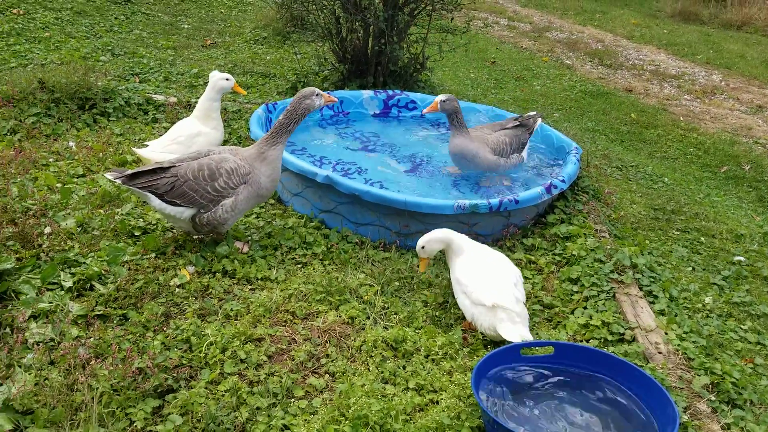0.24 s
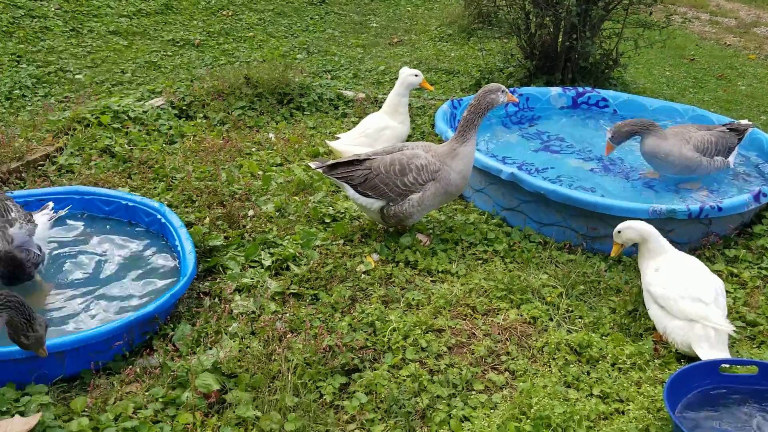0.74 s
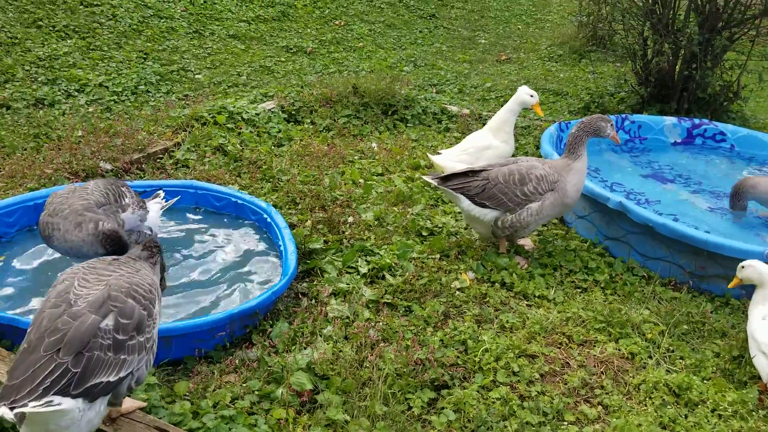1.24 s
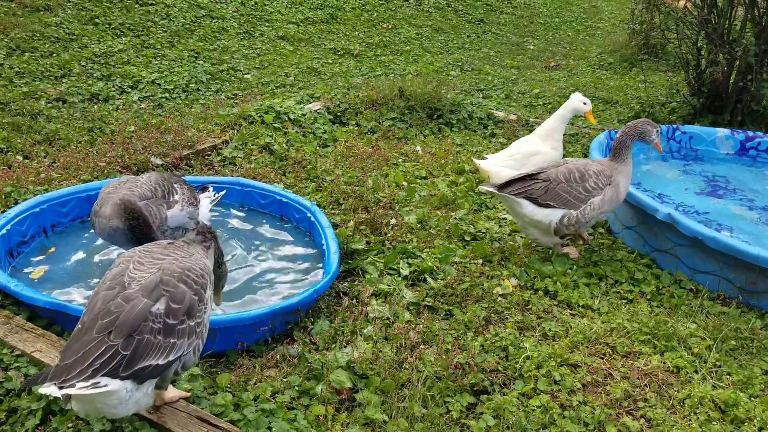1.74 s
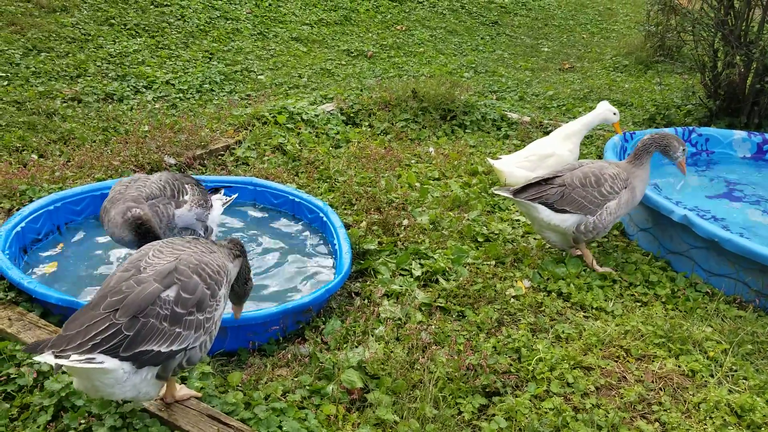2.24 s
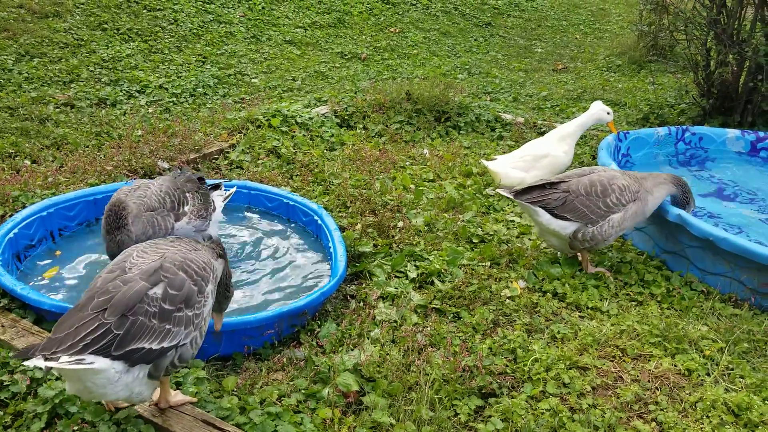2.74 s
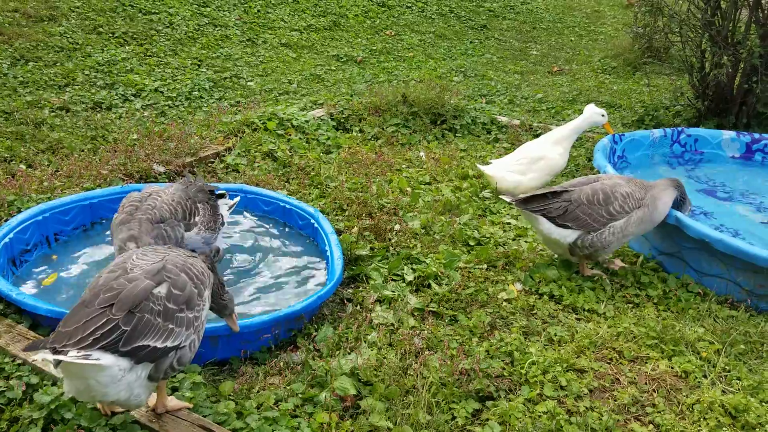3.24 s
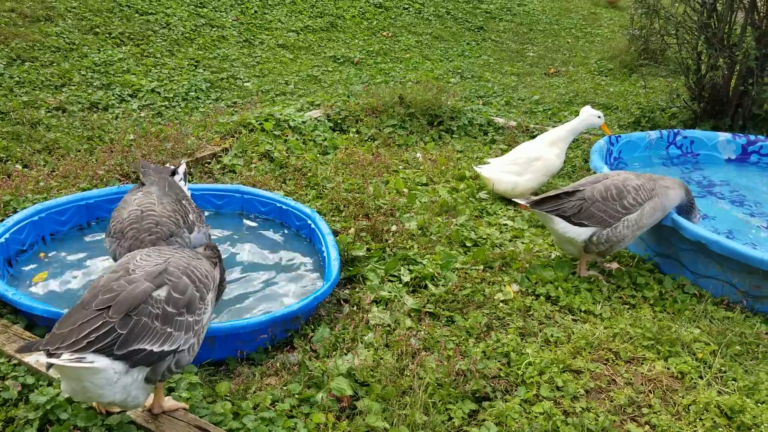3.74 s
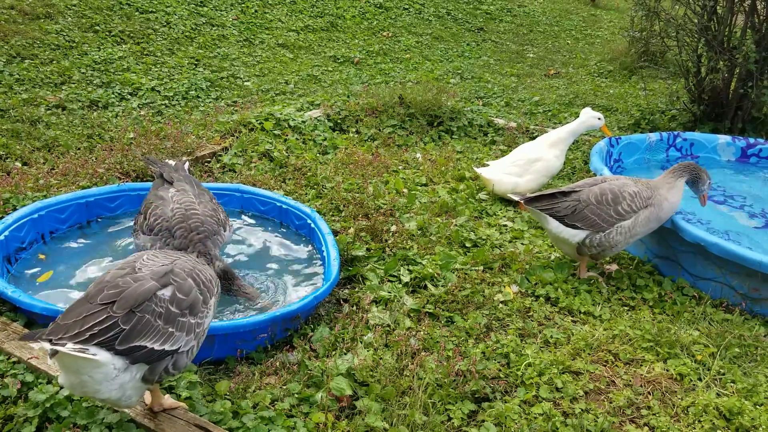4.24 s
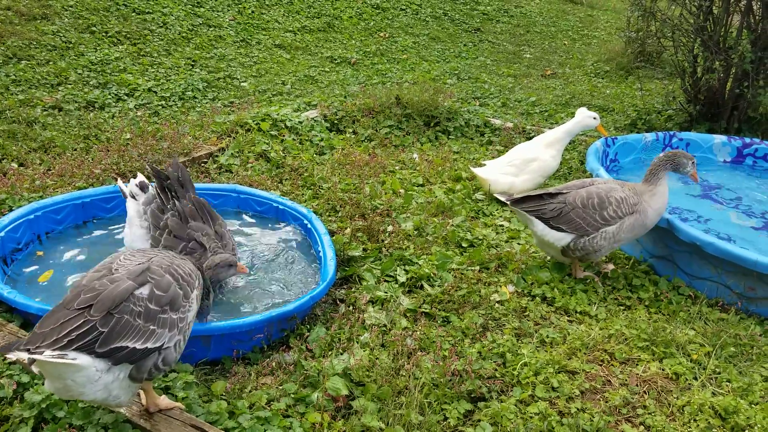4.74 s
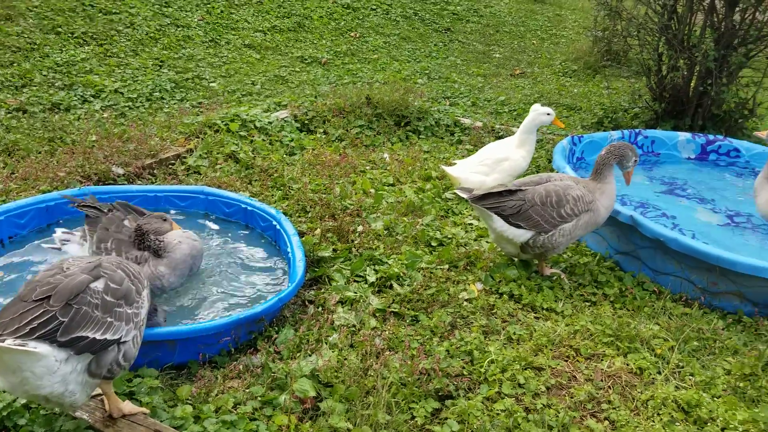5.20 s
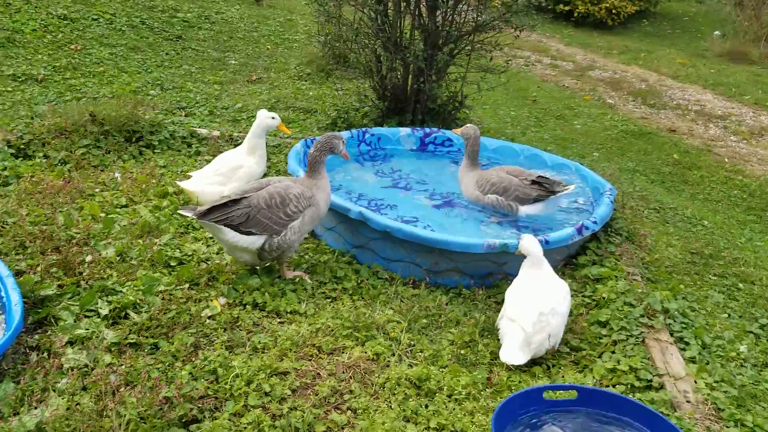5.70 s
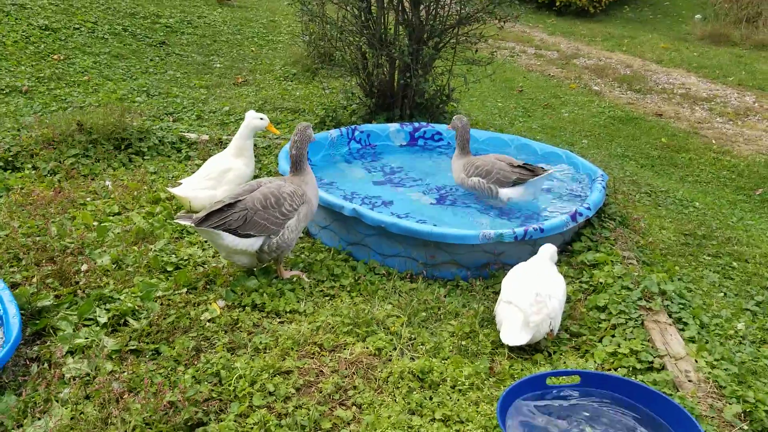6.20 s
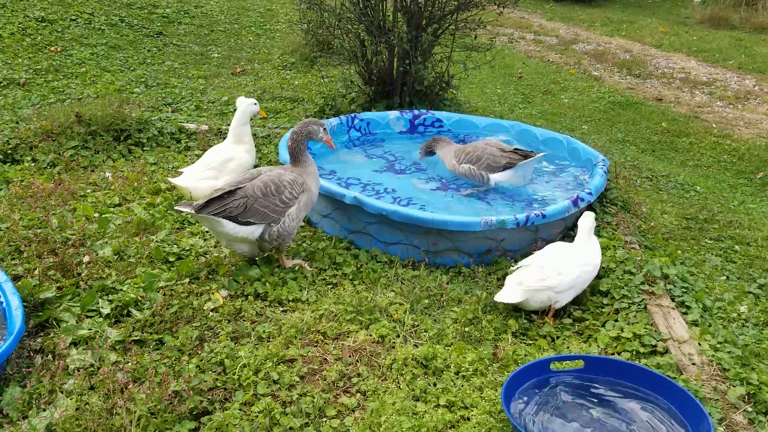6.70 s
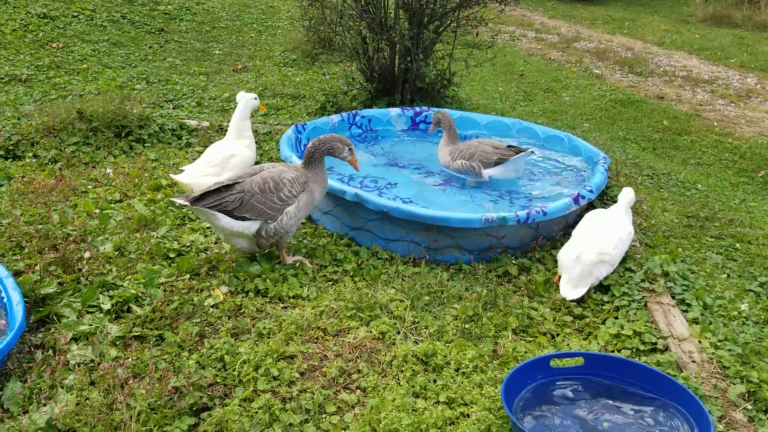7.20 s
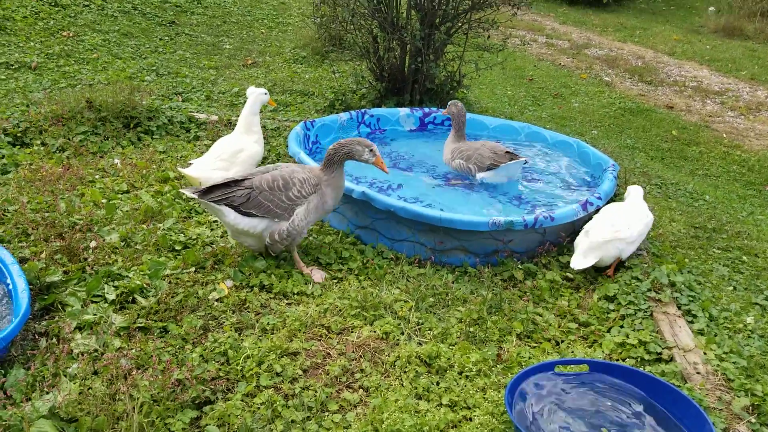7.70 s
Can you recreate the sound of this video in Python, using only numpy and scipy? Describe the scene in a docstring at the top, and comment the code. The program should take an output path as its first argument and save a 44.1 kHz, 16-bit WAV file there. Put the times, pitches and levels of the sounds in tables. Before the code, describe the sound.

Geese cluck low and throaty and murmur softly while bills plop in paddling-pool water, then a bathing goose sloshes and drips over faint insects.

```python
"""Geese around paddling pools

Geese cluck with pulsed throats and murmur in thin tones that break into pulses; a bill snaps and plops
under water. A bathing goose sloshes up swarms of bubbles, spray and drops, with drips and small cracks.
A bird chirps once and a knock bumps the microphone; filtered noise makes crickets and insects over a low hum."""
import sys
import numpy as np
from scipy import signal
from scipy.fft import rfft, irfft, next_fast_len
from scipy.io import wavfile
from scipy.ndimage import map_coordinates

SR = 44100
rng = np.random.default_rng(int(sys.argv[2]) if len(sys.argv) > 2 else 0)


def store_pcm(level_fs):
    """Save levels as 16-bit WAV."""
    pcm = np.round(np.clip(level_fs, -1, 1) * 32767).astype(np.int16)
    wavfile.write(sys.argv[1], SR, np.atleast_2d(pcm).T)


N = 350595
TIME = np.arange(N) / SR

# bill plops under water: start_s, level_db, cavity_hz, click_db
PLOPS = [(.0945, -33.5, 435, -42), (1.8713, -30, 368, -26.5), (1.885, -22, 269, -33),
         (1.9225, -40, 228, -33), (2.0341, -33.5, 267, -45), (2.053, -29.5, 390, -24),
         (2.067, -29.5, 395, -47), (2.164, -32, 292, -40), (2.2666, -25.5, 331, -24),
         (2.3915, -35, 336, -42), (2.408, -25, 342, -22), (2.541, -24, 280, -29.5),
         (3.088, -35.5, 179, -55), (3.649, -34, 156, -55)]
# the bill stirring the pool: peak_s, length_s, gurgle_db, squirt_db
STIRS = [(1.938, 0.017, -50, -41), (2.206, 0.012, -48, -44), (2.34, 0.018, -45, -44),
         (2.466, .02, -50, -46.5), (3.068, .032, -56, -53), (3.441, .024, -46.5, -47),
         (3.595, 0.11, -45, -49.5), (3.666, 0.0077, -59, -42.5), (3.741, 0.012, -34.5, -40),
         (3.85, 0.11, -45, -58.5), (3.946, 0.03, -54, -45.5), (4.365, 0.0061, -58, -42)]


def amp(db):
    """Decibels to gain."""
    return 10 ** (np.asarray(db) / 20)


def unit(x):
    """Scales to rms 1, taken at the centre of a stereo pair."""
    return x / np.sqrt(np.mean(np.atleast_2d(x).mean(0) ** 2) + 1e-20)


def read(points, hz):
    """Reads a spectrum on a log-frequency axis."""
    f, value = np.transpose(points)
    return np.interp(np.log(hz + 1), np.log(f + 1), value)


def level(rows, axis=1):
    """Gain over time from one dB column; silent outside its span."""
    rows = np.array(rows)
    return np.interp(TIME, rows[:, 0], amp(rows[:, axis]), left=0, right=0)


def swells(rows):
    """Bell-shaped gains from rows of (peak_s, length_s, level_db)."""
    t = TIME[::16]
    bells = sum(amp(db) * np.exp(-2 * np.minimum(((t - s) / length) ** 2, 20)) for s, length, db in rows)
    return np.interp(TIME, t, bells)


def wakes(rows, decay_s):
    """Gains that jump up and die away, from rows of (start_s, level_db); their powers add."""
    t = TIME[::16]
    power = sum((t > s) * amp(db) ** 2 * np.exp(-2 * abs(t - s) / decay_s) for s, db in rows)
    return np.interp(TIME, t, np.sqrt(power))


def spells(rows, rise_s=0.34, fall_s=0.33):
    """Gains that rise, hold and fall, from rows of (start_s, end_s, level_db)."""
    return sum(amp(db) * np.interp(TIME, [start - rise_s, start, end, end + fall_s], [0, 1, 1, 0])
               for start, end, db in rows)


def wander(hz):
    """Smooth chance of rms 1 that changes hz times a second."""
    return unit(map_coordinates(rng.standard_normal(8000), [TIME * hz], order=2, mode="wrap"))


def colour(x, points):
    """Gives x a spectrum that falls steeply beyond its ends."""
    hz = np.fft.rfftfreq(x.shape[-1], 1 / SR) + 1
    skirts = np.minimum(hz / points[0][0], 1) ** 4 * np.minimum(points[-1][0] / hz, 1) ** 8
    return irfft(rfft(x) * amp(read(points, hz)) * skirts, x.shape[-1])


def hiss(points):
    """Stereo noise of a given spectrum, whose left-right likeness depends on frequency."""
    # likeness of the two ears: frequency_hz, likeness (0-1)
    likeness = [(60, 0.84), (280, 1), (650, 0.46), (1400, 0), (16000, 0.0016)]
    size = next_fast_len(N)
    a, b = rfft(rng.standard_normal((2, size)))
    same = np.clip(read(likeness, np.fft.rfftfreq(size, 1 / SR)), -1, 1)
    pair = irfft([a, same * a + np.sqrt(1 - same ** 2) * b], size)
    return unit(colour(pair, points)[:, :N])


def add(mix, s, sound):
    """Mixes a sound in at time s."""
    part = mix[..., max(round(s * SR), 0):][..., :sound.shape[-1]]
    part += sound[..., :part.shape[-1]]


def ring(modes, t, rise=0.00082):
    """Impulse response of damped modes (hz, width_hz, level_db) that take a moment to build up."""
    return (1 - np.exp(-t / rise)) * sum(
        amp(db) * np.exp(-np.pi * width * t) * np.sin(2 * np.pi * hz * t) for hz, width, db in modes)


def resonate(x, hz, width):
    """A resonance of gain 1 that follows the curve hz."""
    # shift the resonance to zero frequency, smooth there, shift back
    turn = np.exp(2j * np.pi * np.cumsum(hz) / SR)
    r = np.exp(-np.pi * width / SR)
    return 2 * (turn * signal.lfilter([1 - r], [1, -r], x / turn + 1e-18)).real


def outdoors(x, wet_db, t60, left_db=0, left_lead=0):
    """Direct sound, reaching the left ear earlier (s), plus a short dull scatter from ground and pools."""
    t = TIME[:SR // 3]
    tail = rng.standard_normal((2, len(t))) * amp(-60 * t / t60) * (t > .002)
    tail = signal.lfilter([1], [1, -.6], tail)
    tail /= np.linalg.norm(tail[0])
    left, right = x * np.ones((2, 1))
    direct = np.array([left, np.roll(right, round(left_lead * SR))])
    scatter = signal.oaconvolve(direct, tail, axes=1)[:, :N]
    return (direct + amp(wet_db) * scatter) * amp([[left_db / 2], [-left_db / 2]])


def clucks():
    """Each cluck is a few uneven syrinx pulses ringing the long throat; effort opens and brightens it."""
    # clucks: start_s, pulses, top_pitch_hz, level_db, swell_db (first to last pulse), open_db (bill opening),
    # then three throat resonances in hz
    calls = [(.3452, 5, 94.3, -32.5, -13, 5.5, 625, 1280, 1900),
             (0.4686, 5, 181, -30.5, 15.5, -0.5, 855, 1410, 2080),
             (0.5729, 6, 130.1, -26, 6, 6, 725, 1370, 1980),
             (0.6814, 15, 196.6, -27.5, 1, 0.5, 865, 1470, 2065),
             (0.8474, 2, 100, -22.5, 0.5, 4, 775, 1400, 1900),
             (0.9387, 4, 197.5, -29.5, 3, -1, 890, 1450, 1880),
             (0.9746, 2, 104.1, -27, -4, 6, 745, 1270, 1860), (1.2354, 2, 89, -30, 4, -1, 734, 1340, 1970),
             (1.8329, 5, 129.6, -38.5, 4, -4, 690, 1170, 1700),
             (2.513, 2, 79.1, -29.5, 7.5, 2.5, 780, 1180, 1940),
             (2.9554, 3, 118.2, -29.5, 4.5, -4.5, 790, 1260, 1610),
             (3.2448, 2, 112.3, -30.5, 2.5, -0.5, 750, 1320, 1960),
             (3.34, 3, 76.1, -34.5, 7, 0.5, 765, 1260, 1880), (3.487, 1, 100, -28.5, 4, 4, 726, 1220, 1860),
             (3.5761, 3, 95.7, -28.5, 3, -3, 720, 1230, 1780), (3.7675, 1, 99, -27, 3, 5, 557, 1260, 1760)]
    # the three throat resonances: width_hz, level_db
    throat_modes = [(143, -0.5), (276, 5.5), (154, -6.5)]
    # chest resonances: frequency_hz, width_hz, level_db
    chest = [(200, 136, 1), (427, 270, -6)]
    # beak resonances: frequency_hz, width_hz, level_db
    beak = [(2360, 190, -16), (2790, 260, -18), (3630, 420, -13.5), (4730, 250, -19), (5120, 280, -19.5)]
    pitch_top_at, arch_s = 0.34, .083  # pitch peaks at this share of the cluck; longer clucks bend more
    arch_db_per_s = 86  # effort arches higher in longer clucks
    brighten, sag = 0.95, .04  # brightness per dB of effort; share by which the throat resonances sink
    breath, jitter, shimmer_db = .04, .022, 1.3
    lag_cycles = .8
    out, t = np.zeros(N), TIME[:1500]
    for start, count, hz, db, swell_db, open_db, *resonances in calls:
        s, count = start, max(round(count), 1)
        length = (count - 1) / hz
        for k in range(count):
            along = k / max(count - 1, 1)
            effort_db = arch_db_per_s * length * np.sin(np.pi * along)
            gape_db = effort_db - arch_db_per_s * length / 2
            shift = 1 + sag * (.5 - along)
            lifts_db = [0, -open_db / 2, open_db + brighten * gape_db]
            throat = [(centre * shift, width, mode_db + lift_db)
                      for centre, (width, mode_db), lift_db in zip(resonances, throat_modes, lifts_db)]
            body = amp(open_db / 2 + brighten * gape_db) * ring(beak, t)
            for centre, width, mode_db in chest + throat:  # each quivers, and the lower ones sound later
                centre *= 1 + jitter * rng.standard_normal()
                late = np.maximum(t - lag_cycles / centre, 0)
                body += ring([(centre, width, mode_db)], late, rise=.0017)
            pulse = breath * rng.standard_normal(len(t)) * np.exp(-t / .004)
            pulse[0] += 1
            pulse_db = 1.5 + db + swell_db * (along - .5) + effort_db + shimmer_db * rng.standard_normal()
            add(out, s, amp(pulse_db) * signal.fftconvolve(pulse, body))
            pitch_hz = hz * (1 - ((along - pitch_top_at) * length / arch_s) ** 2)
            s += (1 + jitter * rng.standard_normal()) / pitch_hz
    return outdoors(out, wet_db=-9, t60=0.18)


def murmurs():
    """A thin throat tone breaks into uneven pulses; hoarse air passes the throat and the nasal cavity."""
    # soft creaking calls: air_db, curve of (time_s, pitch_hz, level_db, pulsed share 0-1)
    calls = [(-6, [(0, 722, -47, 0.35), (.13, 724, -47.5, .35), (.18, 765, -43, .75),
             (.215, 751, -45.5, 0.5), (.24, 810, -42.5, .95), (.263, 830, -37.5, 0.84),
             (.277, 720, -46, 1)]), (-9, [(1.415, 822, -63, 0.8), (1.445, 1074, -60, 0.5),
             (1.472, 1222, -57.5, .2), (1.497, 1065, -61, .2)]), (-5.5, [(3.08, 592, -51.5, .1),
             (3.15, 620, -60, 0.3), (3.24, 760, -57, 0.3), (3.33, 700, -62.5, .4), (3.43, 822, -55.5, .6),
             (3.8, 713, -52.5, .7), (3.93, 793, -52, 0.7), (4.03, 813, -54.5, .95), (4.17, 778, -52, 0.34),
             (4.23, 702, -51, 0.64), (4.3, 700, -57, 0.9)])]
    # nasal cavity: frequency_hz, width_hz, level_db
    nasal = [(1500, 460, 0), (2010, 640, 6)]
    nasal_db, throat_width_hz = -11.5, 270
    edge_s, cycles_per_pulse = 0.00083, 7.2
    pitch_waver, pulse_waver, pulse_shimmer_db = .024, .055, 2
    out = np.zeros(N)
    for air_db, curve in calls:
        s, pitch, db, pulsed = np.transpose(curve)
        t = np.arange(s[0], s[-1], 1 / SR)
        hz = np.interp(t, s, pitch) * (1 + pitch_waver * wander(40)[:len(t)])
        pulse_hz = hz / cycles_per_pulse * (1 + pulse_waver * wander(30)[:len(t)])
        cycles = np.cumsum(pulse_hz) / SR
        air, nose_air, strength = rng.standard_normal((3, len(t)))
        pulses = np.diff(np.floor(cycles), prepend=0) * amp(pulse_shimmer_db * strength)
        rasp, air = (unit(resonate(resonate(x, hz, throat_width_hz), hz, throat_width_hz))
                     for x in (pulses, air))
        nose = unit(signal.fftconvolve(unit(pulses) + nose_air, ring(nasal, TIME[:1000]))[:len(t)])
        # crossfade from tone to pulses at equal power
        share = np.clip(np.interp(t, s, pulsed), 0, 1) * np.pi / 2
        tone = np.sqrt(2) * np.sin(2 * np.pi * np.cumsum(hz) / SR)
        throat = unit(np.cos(share) * tone + np.sin(share) * rasp + amp(air_db) * air)
        voice = throat + amp(nasal_db) * nose
        edges = np.minimum(np.minimum(t - s[0], s[-1] - t) / edge_s, 1)
        add(out, s[0], voice * edges * amp(np.interp(t, s, db)))
    return outdoors(out * amp(2 * wander(30)), wet_db=-10, t60=0.096)


def dabbling():
    """The bill snaps in water: a click and the plop of an air pocket; stirs rattle droplets through it."""
    # bill and nasal cavity: frequency_hz, width_hz, level_db
    bill_modes = [(766, 176, -3.5), (1550, 250, 0), (2135, 370, 11), (2465, 180, 4), (4720, 350, 2),
                  (5840, 1240, 8.5)]
    rattles_per_s, snap_wet = 590, 0.076  # droplet rate; noisy share of a snap
    out, t = np.zeros(N), TIME[:4000]
    bill = ring(bill_modes, t)
    for s, db, hz, click_db in PLOPS:
        snap = snap_wet * rng.standard_normal(len(t)) * np.exp(-t / 0.0027)
        snap[0] += 1
        snap = signal.fftconvolve(snap, bill)
        add(out, s, amp(click_db) * snap / abs(snap).max())
        pocket = [(hz, 80, 4), (hz * 1.15, 24, -8), (hz * 1.51, 110, -5), (hz * 2.03, 150, -12)]
        add(out, s + .0012, amp(db) * ring(pocket, t, rise=0.0011))
    droplets = (rng.random(N) < rattles_per_s / SR) * rng.standard_normal(N)
    squirts = swells([(s, length, squirt_db) for s, length, _, squirt_db in STIRS])
    out += unit(signal.oaconvolve(droplets, bill)[:N]) * squirts
    return outdoors(out, wet_db=-9.5, t60=0.15, left_lead=.00013)


def bubble(hz, cycles, rise):
    """A trapped bubble rings and rises in pitch as it nears the surface."""
    age = TIME[:int(4 * cycles / hz * SR) + 2] * hz / cycles  # in decay times
    return np.sin(2 * np.pi * cycles * age * (1 + rise * age)) * np.exp(-age) * (1 - np.exp(-8 * age))


def bubbling(low_hz, high_hz, per_s, cycles, spread_db, count=96):
    """A swarm of bubbles of many sizes, scattered from left to right."""
    out = np.zeros((2, N))
    sizes = [bubble(hz, cycles, rise=0.024) for hz in np.geomspace(low_hz, high_hz, count)]
    chances = np.random.default_rng(rng.integers(2 ** 30)).random((int(per_s * N / SR), 4))
    for when, size, loud, side in chances:
        ears = np.array([[np.cos(side * np.pi / 2)], [np.sin(side * np.pi / 2)]])
        gain = amp(spread_db * min(-np.log(loud), 3))
        add(out, when * N / SR, ears * gain * sizes[int(size * count)])
    return unit(out)


def water():
    """Deep gurgles and the booming pool wall, sloshing bubbles in a soft wash, a patter of drops and spray."""
    # splashes: peak_s, length_s, spray_db, bubbles_db
    splashes = [(1.344, 0.071, -53.5, -80), (3.286, .028, -52, -90), (3.994, 0.066, -49.5, -55),
                (4.562, 0.011, -77, -49), (5.247, 0.013, -52, -61), (5.335, 0.065, -48, -48.5),
                (5.461, .021, -48.5, -56.5), (5.547, 0.033, -44, -54), (5.704, 0.26, -51, -57.5),
                (6.031, 0.048, -50, -53), (6.847, 0.066, -57, -61), (6.942, .016, -49.5, -54.5),
                (7.02, 0.014, -47.5, -44), (7.08, 0.033, -32, -44.5), (7.258, 0.012, -62, -43.5)]
    # spells of lapping water: start_s, end_s, gurgle_db, bubbles_db, drops_db
    lapping = [(3.306, 4.38, -58.5, -63.5, -99), (4.526, 5.202, -100, -83, -73.5),
               (5.384, 6.493, -62, -56, -64), (6.74, 7.39, -58.5, -58.5, -73)]
    # plastic pool wall, booming with the churning water: frequency_hz, level_db
    boom_colour = [(75, 12), (125, -27), (170, -14.5)]
    # sloshing bubbles: frequency_hz, level_db
    bubble_colour = [(300, -57), (520, -23), (720, -6), (1050, -2.5), (1400, -5), (2300, 4.5), (3300, -3),
                     (4800, -22)]
    # pattering drops: frequency_hz, level_db
    drop_colour = [(1500, -2), (3000, 2), (5500, 5.5), (8500, 1.5), (12000, -2.5), (16000, 2.5)]
    # flung spray: frequency_hz, level_db
    spray_colour = [(600, -0.5), (2500, -2), (5500, 0.5), (8000, 4.5), (10000, 2), (12500, 8),
                    (16000, -4.5)]
    churn_db, churn_s = -18.5, 0.083  # a plop leaves the water gurgling
    wake_db, wake_s = -5, 0.049  # a splash leaves bubbles behind
    fallout_db, fallout_s = -21.5, 0.5  # and its spray falls back as drops
    plunge_gurgle_db, boom_db = -2, -4  # deep bubbles under a splash; wall against churn

    lap_gurgle, lap_bubbles, lap_drops = (
        spells((start, end, levels[k]) for start, end, *levels in lapping) for k in range(3))
    plunge = swells([(s, length, db) for s, length, _, db in splashes])
    churn = wakes([(s, db + churn_db) for s, db, *_ in PLOPS], churn_s) + swells([row[:3] for row in STIRS])

    gurgle = lap_gurgle + churn + amp(plunge_gurgle_db) * plunge
    deep = bubbling(179.3, 469, per_s=270, cycles=1.7, spread_db=3.5) * gurgle
    boom = hiss(boom_colour) * churn * amp(boom_db)

    swarm = bubbling(401.4, 4510, per_s=1700, cycles=6.5, spread_db=4.6)
    swarm = swarm + .26 * rng.standard_normal((2, N))  # soft wash
    clumps = amp(3.25 * wander(45))  # slosh and patter come in clumps
    wake = wakes([(s, db + wake_db) for s, _, _, db in splashes], wake_s)
    slosh = unit(colour(swarm, bubble_colour)) * ((lap_bubbles + wake) * clumps + plunge)

    hits = (rng.random(N) < 1200 / SR) * amp(4.8 * np.minimum(rng.exponential(1, N), 4))
    drops = hits * rng.standard_normal((2, N))
    fallout = wakes([(s, db + fallout_db) for s, _, db, _ in splashes], fallout_s)
    patter = unit(colour(drops, drop_colour)) * (lap_drops + fallout) * clumps
    spray = hiss(spray_colour) * swells([row[:3] for row in splashes]) * amp(3.5 * wander(500))
    return outdoors(deep + boom + slosh + patter + spray, wet_db=-12, t60=0.12, left_lead=.00024)


def plinks():
    """Large bubbles plink and plop one by one, and heavy drops tap the surface."""
    # single large bubbles: start_s, level_db, pitch_hz
    big_bubbles = [(4.754, -48.5, 1810), (5.066, -47, 1540), (5.272, -32.5, 1420), (5.323, -27, 1070),
                   (5.323, -30, 293), (5.332, -22.5, 973), (5.335, -35, 277), (5.535, -33, 252),
                   (5.675, -29, 976), (5.745, -37, 920), (5.916, -34, 990), (6.121, -38, 930),
                   (6.178, -36.5, 1040), (6.302, -37.5, 260), (6.333, -34.5, 1840), (6.499, -33, 250),
                   (6.66, -37, 1230), (6.796, -38.5, 874), (6.857, -29, 1530), (6.937, -35.5, 965),
                   (6.951, -32, 346), (7.017, -34, 990), (7.041, -33.5, 288), (7.054, -29, 925),
                   (7.068, -29, 760), (7.141, -37.5, 720), (7.249, -32, 1910), (7.252, -43, 470),
                   (7.262, -35, 1040), (7.272, -31, 683)]
    # heavy drops: start_s, peak_db
    drips = [(5.371, -30), (5.536, -24), (5.679, -28.5), (6.479, -31.5), (6.528, -33), (6.988, -25),
             (7.162, -64), (7.214, -55), (7.246, -49), (7.29, -50), (7.327, -31)]
    # ring of a drop's tap: frequency_hz, width_hz, level_db
    drip_ring = [(1640, 410, 8.5), (2520, 240, 7), (3420, 170, 1), (3650, 340, 8)]
    ring_s, glide = 0.0046, 0.017  # decay time and upward bend of a bubble
    out, t = np.zeros(N), TIME[:1000]
    for s, db, hz in big_bubbles:
        add(out, s, amp(db) * bubble(hz, cycles=hz * ring_s, rise=glide))
    for s, db in drips:
        burst = rng.standard_normal(len(t)) * np.exp(-t / 0.0013)
        tap = signal.fftconvolve(burst, ring(drip_ring, t, rise=0.00023))
        add(out, s, amp(db) * tap / abs(tap).max())
    return outdoors(out, wet_db=-8.5, t60=0.12, left_lead=0.00017)


def ticks():
    """Sharp drips and snapping stalks: tiny bright noise cracks, some with a lower knock."""
    # cracks: start_s, level_db (before a common lift), low_db (gain of the knock against the bright part)
    cracks = [(2.259, -31.5, 8.5), (4.3613, -39.5, 10), (4.5653, -28, -6), (4.611, -33, -23),
              (4.8022, -30, -27), (5.2234, -20.5, -36), (5.906, -25, -5), (6.1473, -20.5, -5),
              (6.22, -22, -28), (6.334, -26.5, -19), (6.756, -24.5, -18), (6.83, -31, -12)]
    lift_db = 3.5
    high = signal.butter(2, 7000, "high", fs=SR, output="sos")
    low = signal.butter(2, [2000, 7000], "band", fs=SR, output="sos")
    out, t = np.zeros((2, N)), TIME[:1024]
    for s, db, low_db in cracks:
        decay = np.exp(-t / 0.00043) + 0.076 * np.exp(-t / 0.002)
        crack = rng.standard_normal((2, len(t))) * decay
        bright, knock = signal.sosfilt(high, crack), signal.sosfilt(low, crack)
        add(out, s + 0.00048, amp(db + lift_db) * (bright + amp(low_db) * knock))
    return outdoors(out, wet_db=-3.0, t60=0.056)


def bump(s=6.6084, db=-4):
    """A knock on the case beside the right microphone: a heavy, quickly damped thud with a scrape."""
    out, t = np.zeros(N), TIME[:3000]
    thud = ring([(245, 240, 7), (83.5, 49, -5.5)], t, rise=.0001) - ring([(116, 67, -0.54)], t, rise=.0001)
    scrape = signal.sosfilt(signal.butter(2, 2200, fs=SR, output="sos"), rng.standard_normal(len(t)))
    add(out, s, amp(db) * (thud + 0.24 * scrape * np.exp(-(t / 0.0064) ** 4)))
    return out * amp([[-17], [0]])


def chirp(start=2.125, length=0.15, db=-50):
    """A small bird's thin buzzy call: two quivering high whistles that sink together."""
    along = np.clip((TIME - start) / length, 0, 1)
    upper = np.sin(2 * np.pi * np.cumsum(8900 - 600 * along + 260 * wander(430)) / SR)
    lower = np.sin(2 * np.pi * np.cumsum(7750 - 350 * along + 130 * wander(400)) / SR)
    return outdoors(amp(db) * (upper + lower) * np.sin(np.pi * along), wet_db=2, t60=0.41)


def yard():
    """Low rumble and a wavering hum, with a cricket chorus and meadow insects as flickering bands of noise."""
    # rumble: frequency_hz, level_db
    rumble_colour = [(35, -8), (48, 5.5), (70, 2), (115, 2), (160, -11), (240, -14.5), (400, -16.5),
                     (520, -26), (800, -20.5), (1200, -30), (1700, -27), (2500, -27), (3200, -40.5),
                     (4000, -38), (6000, -40)]
    # cricket chorus: frequency_hz, level_db
    cricket_colour = [(4500, -15), (5700, -18), (6800, -7.5), (7550, 1), (8000, -4), (8500, -18),
                      (9500, -17.5)]
    # meadow insects over time: time_s, buzz_db (low buzz), fizz_db (high fizz), before a common trim of each
    insects = [(0, -62, -68), (3.9, -63.5, -65), (4.35, -86, -74), (4.8, -62, -65), (5.6, -55.5, -61),
               (6.5, -54, -62), (7.2, -50.5, -63), (7.95, -47.5, -62)]
    # low insect buzz: frequency_hz, level_db
    buzz_colour = [(8000, -3), (9500, -3.5), (10700, 7), (11400, 4.5), (12200, 2)]
    # high insect fizz: frequency_hz, level_db
    fizz_colour = [(10500, -26), (12100, 0), (13200, 1), (14500, -8), (16000, -2.5)]
    rumble_db, crickets_db = -49, -57
    hum_hz, hum_db = 51.3, -49
    rumble = hiss(rumble_colour) * amp(rumble_db) * amp(0.9 * wander(9))
    hum = amp(hum_db + 2.1 * wander(6.9)) * np.sin(2 * np.pi * hum_hz * TIME + 0.27 * wander(4.1))
    crickets = hiss(cricket_colour) * amp(crickets_db + 0.76 * wander(40)) * amp([[1], [-1]])
    buzz = hiss(buzz_colour) * level(insects) * amp(-3.5 + 2.4 * wander(90))
    fizz = hiss(fizz_colour) * level(insects, axis=2) * amp(2.5 + 1.3 * wander(130))
    return (rumble + hum) * amp([[-.8], [.8]]) + crickets + buzz + fizz


def scene():
    """The birds and the water in the yard."""
    return clucks() + murmurs() + dabbling() + water() + plinks() + ticks() + bump() + chirp() + yard()


def record(dry):
    """A low cut; an uneven treble balance that leaves the right duller at the top; then the band limit."""
    edge_hz = 15950
    hz = np.fft.rfftfreq(N, 1 / SR)
    # left against right: frequency_hz, level_db
    balance = [(2500, -0.5), (5000, 1.0), (7600, 6.5), (9000, -4.5), (11000, 8), (12500, 14.0), (15000, 24)]
    lean = amp(read(balance, hz))
    ears = np.array([lean, np.ones(len(hz))]) * np.sqrt(2 / (1 + lean ** 2))  # total power stays
    low_cut = 1 / (1 + (38 / (hz + 1)) ** 8)
    heard = irfft(rfft(dry) * ears * low_cut, N)
    band_limit = signal.firwin(511, edge_hz, window=("kaiser", 9), fs=SR)
    return signal.oaconvolve(heard, band_limit[None], "same")


dry = scene()
out = record(dry)
store_pcm(out)
```